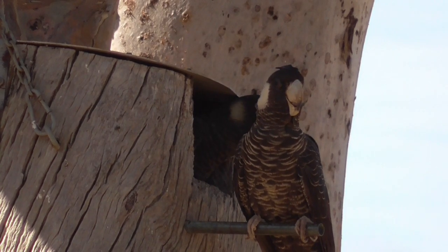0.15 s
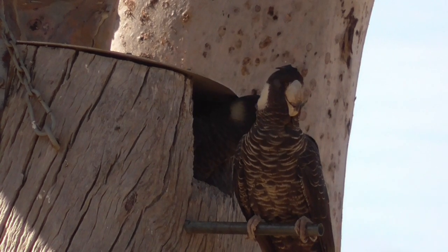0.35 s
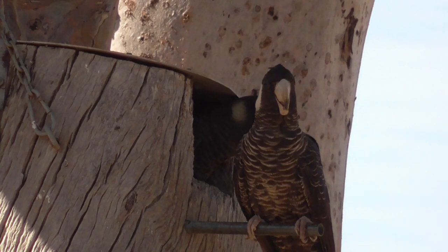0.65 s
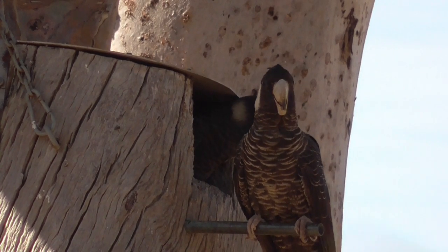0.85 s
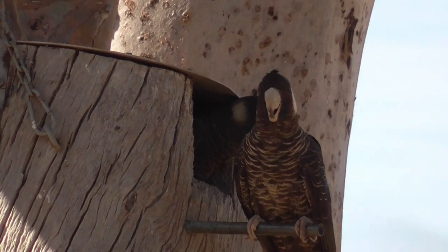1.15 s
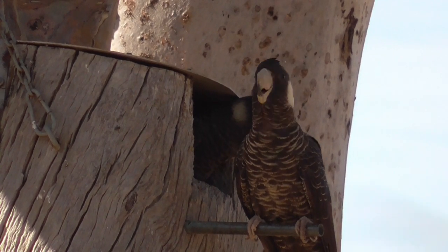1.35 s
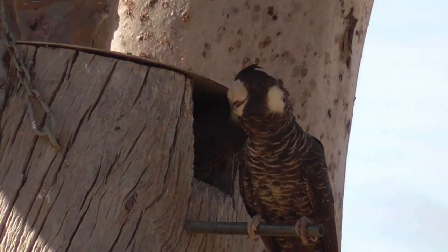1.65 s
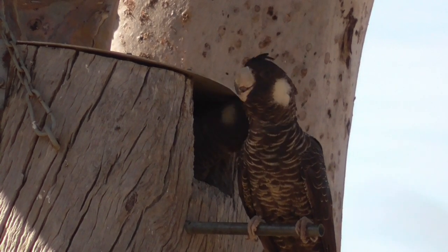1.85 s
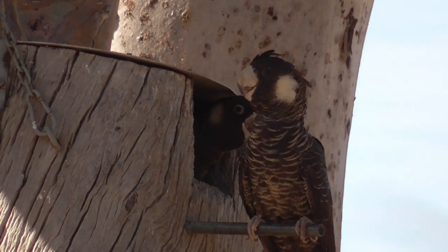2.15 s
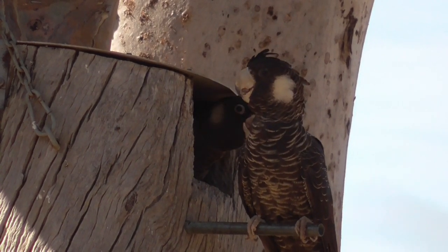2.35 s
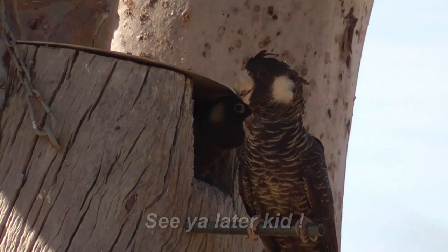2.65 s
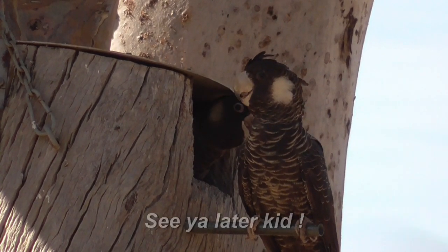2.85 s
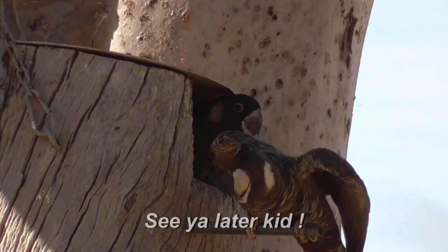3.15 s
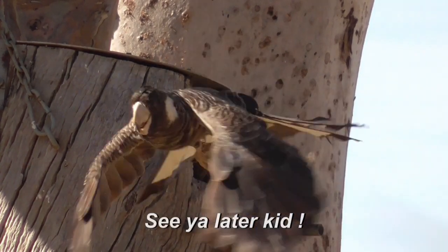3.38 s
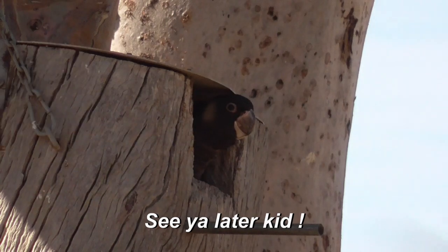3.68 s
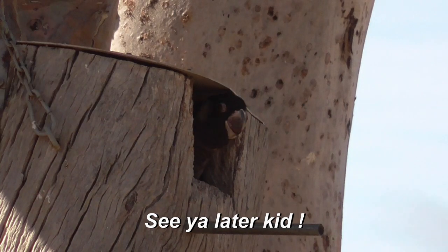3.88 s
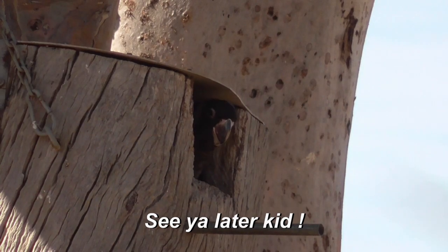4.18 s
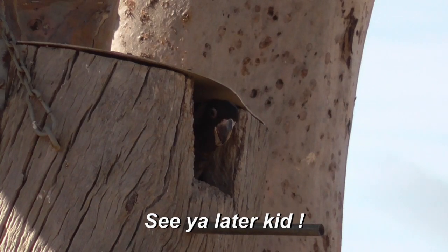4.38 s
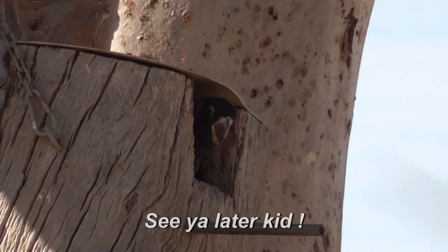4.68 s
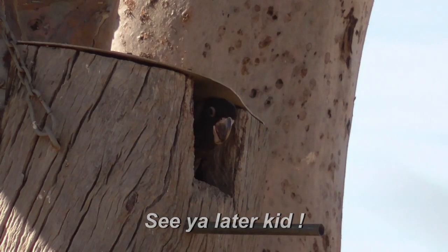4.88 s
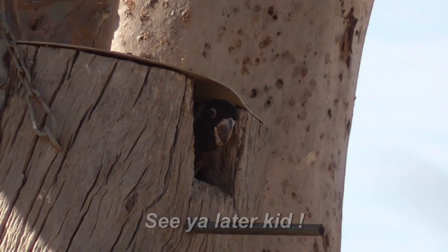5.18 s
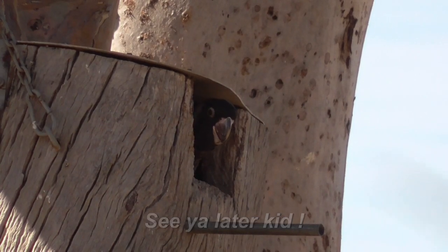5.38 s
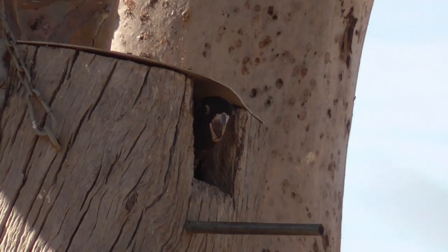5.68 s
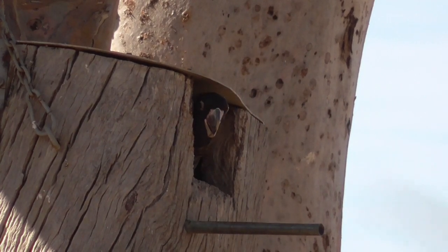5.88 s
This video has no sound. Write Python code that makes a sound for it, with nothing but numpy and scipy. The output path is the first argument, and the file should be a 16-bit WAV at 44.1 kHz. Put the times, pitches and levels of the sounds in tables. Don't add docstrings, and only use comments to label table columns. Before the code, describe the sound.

A woodland near a road, heard through a small stereo recorder with light hiss. Low traffic rumbles throughout, while a distant engine rises through its gears until about 3.5 s, eases down to about 5 s, then rises again. From 0.6 s a far warbler sings soft, low rolled and held syllables, in loose groups until about 4.4 s. Leaves rustle briefly near 1 s, a small bird chips at 1.6-1.7 s, and a far whistle slurs down at 1.8 s. Faint leaf ticks come around 3 s. At 4.5 s a close black cockatoo wails loudly, rising from low, croaking at the break, leaping high, then sagging until 5 s. A rasping exhale follows. At 5.2 s it croaks and gasps, then wails again, climbing quickly and stepping down to a trailing end at 5.6 s. Trunks scatter short echoes. A faint low coo sounds at 5.8 s over the continuing rumble.

```python
import sys
import numpy as np
from scipy import signal
from scipy.fft import rfft, irfft, next_fast_len
from scipy.io import wavfile
from scipy.ndimage import uniform_filter1d

SR = 44100
rng = np.random.default_rng(int(sys.argv[2]) if len(sys.argv) > 2 else 0)


def log_audio(samples):
    frames = np.atleast_2d(samples).T
    limited = np.clip(frames, -1, 1)
    pcm = np.round(limited * 32767).astype(np.int16)
    wavfile.write(sys.argv[1], SR, pcm)


def gain_from_decibels(decibels):
    exponent = np.asarray(decibels, float) / 20
    return 10 ** exponent


N = 265923


def in_time(rows, size=0):
    s, *columns = np.transpose(sorted(map(tuple, rows)))
    at = np.arange(int(s[0] * SR) - size, min(int(s[-1] * SR) + size, N))
    return at, [np.interp(at / SR, s, c) for c in columns]


def at_hz(points, hz):
    table_hz, table_db = np.transpose(points)
    return np.interp(np.log(hz), np.log(table_hz), table_db)


def cycle_phase(hz):
    return 2 * np.pi * np.cumsum(hz) / SR


def drift(rate_hz, size):
    r = np.exp(-2 * np.pi * rate_hz / SR)
    slow = signal.lfilter([1], [1, -2 * r, r * r], rng.standard_normal(size + SR))[SR:]
    return (slow - slow.mean()) / slow.std()


def fade(size, edge_s):
    k = np.arange(size)
    return np.minimum(1, np.minimum(k, k[::-1]) / (edge_s * SR))


def panned(x, pan_db):
    return x * gain_from_decibels(np.reshape([pan_db / 2, -pan_db / 2], (2, -1)))


def band_pass(order, low_hz, high_hz):
    return signal.butter(order, [low_hz, high_hz], "band", fs=SR, output="sos")


# freq_hz, likeness_0_to_1
LIKENESS = [(30, .95), (60, 0.8), (125, 0.86), (250, 0.75), (500, 0.71), (1000, 0.44), (3000, 0.52),
            (8000, 0.033), (15000, .05)]


def coloured(spectrum):
    size = next_fast_len(N)
    hz = np.maximum(np.arange(size // 2 + 1) * SR / size, 1)
    mid, side = rfft(rng.standard_normal((2, size))) * gain_from_decibels(at_hz(spectrum, hz))
    like = np.clip(at_hz(LIKENESS, hz), 0, 1)
    mid, side = mid * np.sqrt(1 + like), side * np.sqrt(1 - like)
    out = irfft(np.array([mid + side, mid - side]), size)[:, :N]
    return out / np.sqrt(np.mean(out.mean(axis=0) ** 2))


# freq_hz, level_db
OVERTONES = [(4500, -7), (6500, 6.5), (7800, -28), (9500, 0.5), (11500, -15.5), (12600, -4), (13500, -38),
             (16000, -44)]


def whistle(rows, throat, beak, wobble, upper_db, edge_s):
    out = np.zeros(N)
    at, (hz, db) = in_time(rows, size=40)
    hz = uniform_filter1d(hz, size=200) * (1 + wobble * drift(250, len(at)))
    phase = cycle_phase(hz)
    db = uniform_filter1d(db, size=200)
    beak_db = np.interp(at / SR, *np.transpose(beak))
    step_db = -8.5 + 0.33 * (db - db.max()) + beak_db
    levels = []
    for k in range(3):
        flutter_db = 0.96 * (1 + k) * drift(25.2, len(at))
        throat_db = at_hz(throat, (k + 1) * hz) - at_hz(throat, hz)
        levels.append(db + flutter_db + k * step_db + throat_db)
    upper = levels[2] + upper_db + 3.25 * beak_db
    levels += [upper + at_hz(OVERTONES, k * hz) for k in (4, 5, 6)]
    tone = sum(gain_from_decibels(level_db) * np.sin(k * phase + k) for k, level_db in enumerate(levels, 1))
    out[at] = np.sqrt(2) * tone * fade(len(at), edge_s)
    return out


def stack(rows, throat, wobble, count):
    out = np.zeros(N)
    at, (hz, db) = in_time(rows)
    hz = uniform_filter1d(hz, size=250) * (1 + wobble * drift(160, len(at)))
    phase = cycle_phase(hz)
    tone = sum(gain_from_decibels(at_hz(throat, k * hz)) * np.sin(k * phase + k * k) for k in range(1, count + 1))
    out[at] = tone * gain_from_decibels(db) * fade(len(at), 0.0036)
    return out


# time_s, beat_hz, depth_db
BEATS = [
    [(4.608, 700, -22), (4.622, 706, -19.5), (4.638, 750, -22)],
    [(5.266, 794, -26), (5.272, 800, -13), (5.28, 814, -48)],
]


def beating():
    gain = np.ones(N)
    for rows in BEATS:
        at, (hz, db) = in_time(rows)
        phase = cycle_phase(hz)
        gain[at] += 2 * gain_from_decibels(db) * (np.cos(phase) + 0.1 * np.cos(2 * phase)) * fade(len(at), 0.0037)
    return gain


# time_s, pitch_hz, effort_db
FIRST_WAIL = [
    [(4.517, 1194, -49.5), (4.525, 1400, -43.5), (4.534, 1646, -40), (4.543, 1820, -50)],
    [(4.594, 3460, -45), (4.607, 3467, -31.5), (4.634, 3665, -26.5), (4.655, 3683, -37), (4.68, 3670, -31),
     (4.728, 3930, -22.5), (4.755, 3850, -22), (4.779, 3450, -29)],
    [(4.78, 2980, -30.5), (4.82, 2775, -32), (4.858, 2684, -32), (4.876, 2760, -30.5), (4.941, 2585, -40.5)],
    [(4.941, 2148, -33), (4.954, 2073, -31), (4.976, 1630, -44.5)],
]
SECOND_WAIL = [
    [(5.211, 1590, -40), (5.232, 1925, -26.5), (5.243, 2087, -29)],
    [(5.243, 2710, -34), (5.25, 2863, -23), (5.265, 3030, -32.5)],
    [(5.265, 3660, -24.5), (5.277, 3765, -23), (5.287, 3730, -47), (5.297, 4150, -58)],
    [(5.31, 3890, -42), (5.323, 3760, -20.5), (5.336, 3746, -22.5), (5.349, 3545, -32.5)],
    [(5.349, 2888, -28), (5.38, 2865, -31.5), (5.402, 2736, -32), (5.418, 2520, -38), (5.455, 2427, -47.5)],
    [(5.45, 1880, -48), (5.466, 1855, -40), (5.498, 2059, -32.5), (5.518, 2010, -31), (5.546, 1902, -34.5),
     (5.6, 1876, -40), (5.616, 1837, -35), (5.628, 1810, -36), (5.641, 1672, -38)],
]
# freq_hz, level_db
WAIL_THROAT = [(1400, 8), (2000, 2.06), (2800, -0.4), (3800, 11.5), (5700, 5), (7500, -5), (8400, -6),
               (11400, -6)]
# time_s, added_db_per_higher_partial
BEAK = [(4.52, 0), (4.63, -1.5), (4.675, -4), (4.74, 1), (4.8, 3), (4.88, -8), (4.93, -2.5), (4.95, -1),
        (5.219, 4.5), (5.255, -6.5), (5.29, 5), (5.33, -1.5), (5.37, -4), (5.43, -2.5), (5.5, -1),
        (5.62, 0.25)]


def wails():
    notes = FIRST_WAIL + SECOND_WAIL
    voice = sum(whistle(note, WAIL_THROAT, BEAK, wobble=.0006, upper_db=-6, edge_s=.001) for note in notes)
    return beating() * voice


# freq_hz, level_db_per_hz
BREATH = [(500, -26), (1000, -4.5), (2000, -14.5), (4500, -2.5), (6000, -13), (7000, -15), (11500, -22),
          (13000, -40)]
# start_s, level_db, decay_s
GASPS = [
    (4.985, -63, .16),
    (5.208, -44, 0.053),
]


def breath(voice, share_db):
    strength = gain_from_decibels(share_db) * np.sqrt(np.abs(uniform_filter1d(voice ** 2, size=200)))
    t = np.arange(N) / SR
    rush = np.zeros(N)
    for start_s, db, decay_s in GASPS:
        onset = np.clip((t - start_s) / 0.0045, 0, 1)
        rush += gain_from_decibels(db) * onset * np.exp(-np.abs(t - start_s) / decay_s)
    return (strength + rush) * coloured(BREATH)[0]


# time_s, pulse_hz, level_db
CROAKS = [
    [(4.543, 790, -49), (4.556, 869, -49), (4.57, 853, -66), (4.592, 807, -68)],
    [(5.203, 710, -58), (5.21, 680, -51.5), (5.22, 750, -45)],
]
# freq_hz, level_db
CROAK_THROAT = [(700, -4), (1600, 2), (2600, 9.5), (3400, 11), (4300, 1.5), (5300, -16), (9000, -17),
                (12000, -26)]


def croaks():
    return sum(stack(rows, CROAK_THROAT, wobble=0.011, count=14) for rows in CROAKS)


# time_s, level_db, throat_hz
RASP = [
    (5.0, -48, 1410),
    (5.09, -47, 1236),
    (5.2, -53.5, 1253),
]


def rasp():
    out = np.zeros(N)
    at, (db, hz) = in_time(RASP)
    beats = np.cumsum(220 * gain_from_decibels(3 * drift(60, len(at)))) / SR
    pulse_gain = gain_from_decibels(2 * rng.standard_normal(len(at)))[beats.astype(int)]
    pulse = np.exp(-3.0 * (beats % 1)) * pulse_gain
    cycles = np.cumsum(hz) / SR
    since = cycles - np.maximum.accumulate(cycles * (np.diff(beats // 1, prepend=0) > 0))
    ring = np.sin(2 * np.pi * since)
    ring += .5 * np.sin(2 * np.pi * 1.36 * since) + 0.067 * np.sin(2 * np.pi * 2.2 * since)
    out[at] = gain_from_decibels(db + 11.5) * pulse * ring * fade(len(at), 0.006)
    return signal.sosfilt(band_pass(2, 950, 6000), out)


def cockatoo():
    voice = wails()
    return voice + breath(voice, share_db=-36) + croaks() + rasp()


# time_s, pitch_hz, level_db
SLUR = [(1.8, 1596, -63.5), (1.833, 1567, -61.5), (1.85, 1515, -49.5), (1.9, 1368, -48.5),
        (1.945, 1297, -59), (1.975, 1290, -71)]
# freq_hz, level_db
SLUR_THROAT = [(1300, 15), (1580, -3.2), (2800, -19), (3050, 7.5), (4250, -1), (4700, 1)]
# time_s, added_db_per_higher_partial
SLUR_BEAK = [(1.83, 8.5), (1.85, .1), (1.9, -1)]


def slur():
    return whistle(SLUR, SLUR_THROAT, SLUR_BEAK, wobble=0.0026, upper_db=-34.5, edge_s=0.0073)


# time_s, pitch_hz, level_db
COO = [(5.77, 644, -53.5), (5.806, 669, -52.5), (5.886, 649.6, -54.5), (5.91, 653, -55)]
# freq_hz, level_db
COO_THROAT = [(650, 5), (1310, 5.5), (1970, 11.5)]


def coo():
    return whistle(COO, COO_THROAT, [(0, 0.011)], wobble=0.0036, upper_db=-2.5, edge_s=0.0067)


# time_s, pitch_hz, level_db
CHIPS = [
    [(1.558, 3830, -54), (1.575, 3585, -56), (1.6, 3214, -69)],
    [(1.645, 3920, -67), (1.67, 3900, -64), (1.695, 3940, -67)],
    [(1.71, 3430, -69), (1.727, 3700, -58), (1.745, 4970, -66)],
]


def chips():
    return sum(stack(rows, [(100, 0), (9000, 0)], wobble=.012, count=1) for rows in CHIPS)


# start_s, length_s, top_hz, level_db
ROLLS = [(.598, 0.026, 774, -62.5), (.63, 0.025, 809, -63.5), (.66, 0.049, 792, -63),
         (.71, 0.046, 797, -63.5), (.765, 0.032, 785, -62), (1.272, 0.05, 784, -63.5),
         (1.32, 0.054, 780, -66.5), (2.59, 0.077, 790, -67), (2.66, 0.049, 817, -67.5),
         (4.095, .072, 775, -65.5), (4.228, 0.037, 795, -57), (4.27, .055, 790, -60.5)]
RISES = [(.555, .043, 772.7, -69), (1.418, .035, 705, -66.5), (4.375, 0.033, 724, -64)]
FALLS = [(1.397, 0.02, 790, -62.5), (1.558, 0.044, 780, -67), (2.45, .05, 790, -76)]
# start_s, length_s, pitch_hz, level_db
HOLDS = [(.8, 0.063, 794, -70), (1.185, 0.0345, 767, -66), (1.235, 0.032, 922, -64),
         (1.372, 0.019, 934, -60), (1.453, .05, 693.5, -72), (2.5, .09, 690, -68), (2.71, 0.097, 800, -71),
         (3.262, .025, 782, -61), (3.287, .063, 769, -59.5), (3.35, .5, 748.4, -70.5),
         (4.05, 0.0447, 746, -64), (4.172, .052, 873, -60.5), (4.332, 0.027, 922, -56),
         (4.405, 0.027, 725, -71)]
# start_s, end_s
HOARSE = [(2.59, 2.9), (3.35, 3.9)]
# freq_hz, level_db
WARBLE_THROAT = [(750, -1), (1450, -1), (1850, -2), (2200, 1), (2700, -12), (3150, -2), (3500, -10),
                 (3900, -7)]
# time_s, added_db_above_third_partial
WARBLE_BEAK = [(.6, 1), (.85, 2.5), (1.2, -13), (1.5, -16), (1.56, 6.5), (2.5, -4), (2.7, 1), (3.3, -1),
               (4.08, 1.5), (4.2, -8), (4.45, -5)]


def warble():
    t, hz, gain = np.arange(N) / SR, np.full(N, 780.), np.zeros(N)
    # syllables, share of the pitch lost at u (0 to 1) through each, fade_db
    kinds = [(ROLLS, lambda u: 0.13 * np.sin(np.pi * u) ** 2, 0),
             (RISES, lambda u: 0.13 * (1 - u), 0),
             (FALLS, lambda u: 0.17 * np.sin(np.pi * u / 2), 0),
             (HOLDS, lambda u: 0.025 * u, 7)]
    for rows, below_top, fade_db in kinds:
        for start_s, length_s, top_hz, db in rows:
            on = (t >= start_s) & (t < start_s + length_s)
            part = (t[on] - start_s) / length_s
            hz[on] = top_hz * (1 - below_top(part))
            gain[on] = gain_from_decibels(db - fade_db * part)
    wobble = .007 + .028 * sum((t > start_s) & (t < end_s) for start_s, end_s in HOARSE)
    hz = uniform_filter1d(hz, size=200) * (1 + wobble * drift(211, N))
    phase = cycle_phase(hz)
    beak_db = np.interp(t, *np.transpose(WARBLE_BEAK))
    tone = np.zeros(N)
    for k in range(1, 6):
        db = at_hz(WARBLE_THROAT, k * hz) + (k > 3) * beak_db - 4 * (k > 4) + 2.5 * drift(40, N)
        tone += gain_from_decibels(db) * np.sin(k * phase + k * k)
    return np.sqrt(2) * tone * uniform_filter1d(gain, size=250) * gain_from_decibels(2 * drift(70, N))


# freq_hz, t60_s
WOOD_T60 = [(500, 0.48), (2000, 0.86), (4000, 0.77), (8000, 0.89), (15000, 0.14)]
# delay_s, level_db, spread_s
ECHOES = [
    (0.018, -2, 0.0017),
    (0.041, -0.5, 0.0059),
    (.075, -11, .008),
    (0.119, -17, 0.0015),
]


def wood(x, tail_db, echo_db):
    t = np.arange(SR) / SR
    tail, edges_hz = np.zeros((2, SR)), 400 * 2.0 ** np.arange(6.0)
    white = rng.standard_normal((2, SR)) + 0.91 * rng.standard_normal(SR)
    for low_hz, high_hz in zip(edges_hz, np.minimum(2 * edges_hz, .45 * SR)):
        band = signal.sosfilt(band_pass(2, low_hz, high_hz), white)
        tail += band * gain_from_decibels(-60 * t / at_hz(WOOD_T60, 1.26 * low_hz))
    tail *= gain_from_decibels(tail_db) * np.minimum(1, t / 0.01) / np.sqrt(np.sum(tail ** 2) / 2)
    for delay_s, db, spread_s in ECHOES:
        clump = np.exp(-((t - delay_s) / spread_s) ** 2)
        tail += gain_from_decibels(db + echo_db) * white * clump / np.sqrt(np.sum(clump ** 2))
    return signal.fftconvolve(x[None], tail, axes=1)[:, :N]


# start_s, level_db, decay_s
RUSTLES = [
    (0.983, -60, 0.06),
    (2.929, -76, .01),
    (2.99, -74, 0.0034),
    (3.12, -84, .008),
]


def rustles():
    t = np.arange(N) / SR
    puffs = np.zeros(N)
    for start_s, db, decay_s in RUSTLES:
        puffs += gain_from_decibels(db) * (t > start_s) * np.exp(-np.abs(t - start_s) / decay_s)
    return puffs * coloured([(1500, -28), (3500, 5), (6000, -5.5), (12000, -11), (16000, -28)])


def held_ends(rows):
    return [(0, *rows[0][1:]), *rows, (7, *rows[-1][1:])]


# time_s, firing_hz, level_db
ENGINE = [(0.0, 49.6, -68.5), (1.12, 67.2, -66), (1.34, 66.7, -71), (1.56, 71.4, -63.5), (3.51, 83.3, -62),
          (3.75, 82.6, -74), (3.91, 75.9, -79), (4.21, 64.8, -68), (4.95, 50.9, -73), (6.03, 67.3, -63.5)]


def engine():
    _, (hz, db) = in_time(held_ends(ENGINE))
    phase = cycle_phase(hz)
    return np.sqrt(2) * gain_from_decibels(db + 1.5 * drift(4, N)) * (np.sin(phase) + .2 * np.sin(2 * phase))


# time_s, level_db
TRAFFIC = [(0.0, -53.5), (0.86, -52), (1.98, -54), (3.56, -52.5), (3.88, -53.5), (4.2, -53), (4.84, -54),
           (6.03, -54.5)]
# freq_hz, level_db_per_hz
RUMBLE = [(15, -46), (25, -24), (70, -11.5), (103, -5), (136, -3.5), (295, -2.5), (345, -6.5), (372, -3.5),
          (539, -6), (594, -6), (928, -7.5), (1570, -19), (2600, -44), (3380, -60), (5720, -120)]
HISS = [(1180, -67), (2000, -1.5), (2220, -1.5), (2750, -8.5), (3400, -5), (4110, -4.5), (4480, -7),
        (5270, -10), (5940, -14), (8380, -8), (9200, -9.5), (11800, -9), (15500, -14.5)]


def traffic_and_hiss():
    _, (rumble_db,) = in_time(held_ends(TRAFFIC))
    rumble = gain_from_decibels(rumble_db + .5 * drift(3.5, N)) * coloured(RUMBLE)
    return rumble + gain_from_decibels(-68) * coloured(HISS)


# time_s, left_minus_right_db
NEAR_PAN = [(4.5, -2.1), (4.95, -2), (5.2, 2.2), (5.7, -3.8)]


def scene():
    near = cockatoo()
    far = slur() + coo() + chips()
    warbler = warble()
    near_pan_db = np.interp(np.arange(N) / SR, *np.transpose(NEAR_PAN))
    birds = panned(near, near_pan_db) + wood(near, tail_db=-12.5, echo_db=-13)
    birds += panned(far, -1.8) + wood(far, tail_db=-9, echo_db=-10)
    birds += panned(warbler, -1.8) + wood(warbler, tail_db=-7.5, echo_db=-10)
    return birds + rustles() + panned(traffic_and_hiss() + engine(), -1.36)


def starve(dry, low_hz, high_hz, loud_db, cut_db):
    level_db = 10 * np.log10(np.abs(uniform_filter1d(dry.mean(axis=0) ** 2, size=2600)) + 1e-12)
    band = signal.sosfiltfilt(band_pass(6, low_hz, high_hz), dry)
    return dry - band * (1 - gain_from_decibels(cut_db * np.clip((level_db - loud_db) / 3, 0, 1)))


def roll_off(x):
    return signal.sosfilt(signal.butter(12, 15680, fs=SR, output="sos"), x)


def record(dry):
    dry = signal.sosfilt(signal.butter(3, 34, "high", fs=SR, output="sos"), dry)
    dry = starve(dry, low_hz=12500, high_hz=17000, loud_db=-32, cut_db=-22)
    dry = starve(dry, low_hz=6350, high_hz=6950, loud_db=-36, cut_db=-20)
    dry = starve(dry, low_hz=9100, high_hz=10600, loud_db=-30, cut_db=-9)
    return roll_off(dry)


dry = scene()
out = record(dry)
log_audio(out)
```